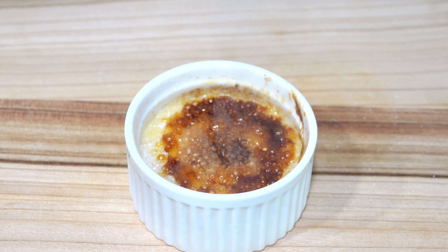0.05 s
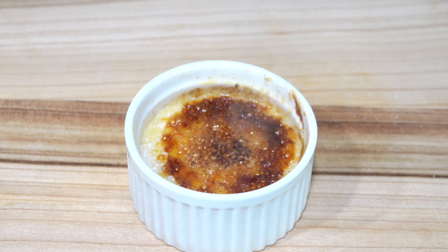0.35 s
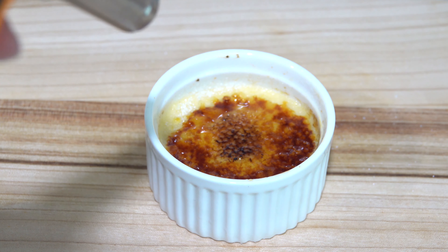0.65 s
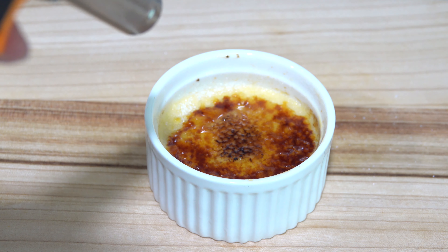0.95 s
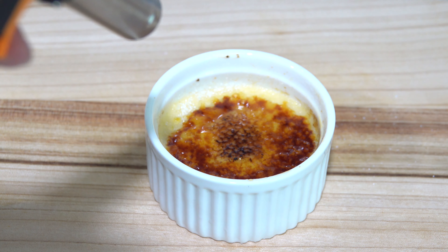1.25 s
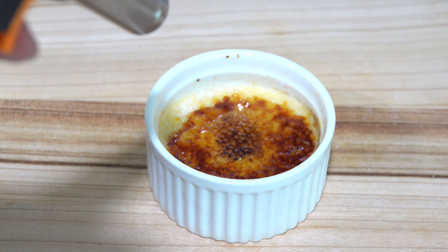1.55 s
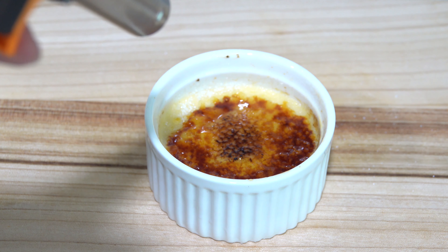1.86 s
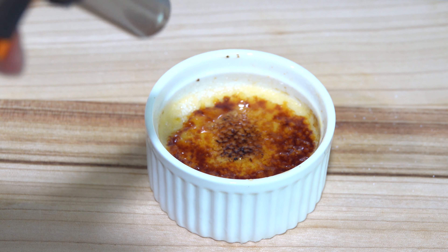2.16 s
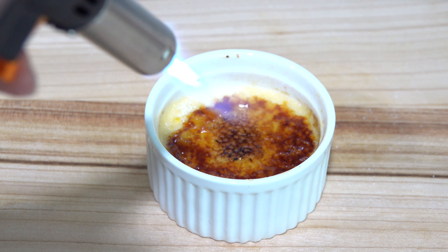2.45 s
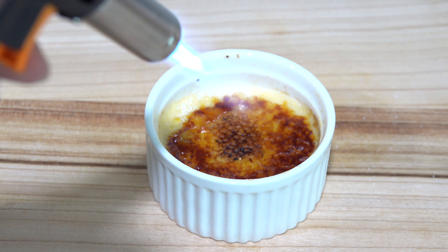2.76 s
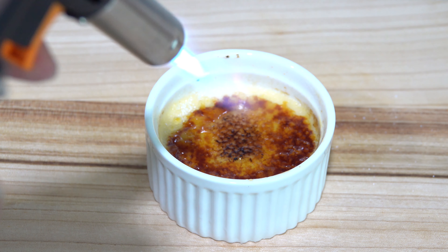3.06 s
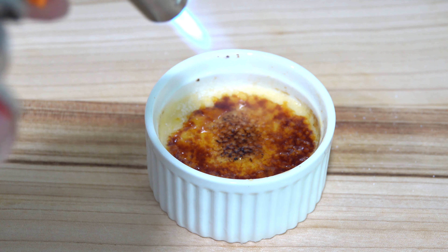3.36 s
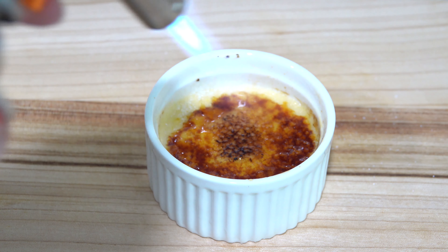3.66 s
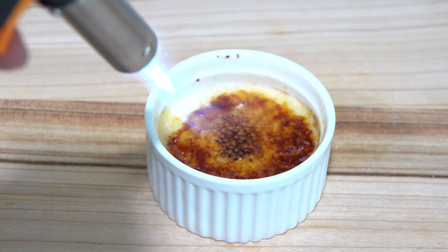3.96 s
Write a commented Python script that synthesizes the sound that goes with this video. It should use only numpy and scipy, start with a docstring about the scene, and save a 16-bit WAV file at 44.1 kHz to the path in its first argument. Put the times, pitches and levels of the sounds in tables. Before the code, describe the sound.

Close up in a quiet kitchen, a gas torch hisses, snaps alight and burns with a wavering roar and thin whistle. Faint knocks on wood come first, and the trigger clicks once just after ignition.

```python
"""A quiet kitchen, a stereo microphone close to a hand-held gas torch over a wooden board.
Soft knocks on the board, then the valve opens and cold gas hisses through the burner tube.
The igniter snaps, the gas catches with a thump and burns with an unsteady roar, the trigger clicks
back, and the hot tube rings higher. Low room rumble and mains hum lie underneath."""
import sys
import numpy as np
from scipy import signal
from scipy.fft import rfft, irfft
from scipy.io import wavfile
from scipy.ndimage import uniform_filter1d

SR = 44100
rng = np.random.default_rng(int(sys.argv[2]) if len(sys.argv) > 2 else 0)


def master(y):
    """Save y as 16-bit WAV."""
    cut = np.clip(np.atleast_2d(y).T, -1, 1)
    pcm = np.round(cut * 32767)  # scale
    wavfile.write(sys.argv[1], SR, pcm.astype(np.int16))


N = 176400
TIME, HZ = np.arange(N) / SR, np.fft.rfftfreq(N, 1 / SR)
LIGHT_S, CATCH_S = 2.307, 0.015  # when the gas lights, and how fast the flame takes over
BURN_S = np.maximum(TIME - LIGHT_S, 0)
ALIGHT = 1 - np.exp(-BURN_S / CATCH_S)  # 0 while cold, 1 once burning


# The flame, close up: frequency_hz, density_db
COMBUSTION_SPECTRUM = [(20, -79), (60, -79), (100, -63.5), (150, -73.5), (205, -59.5), (300, -57),
                       (420, -55), (610, -56), (760, -64.5), (1100, -71), (1750, -70.5), (2050, -76),
                       (3500, -81), (8000, -105)]
# Resonances of the space around the flame: pitch_hz, width_hz, lift_db
FLAME_HOLLOWS = [(222.5, 21.5, 9.5), (242.6, 13.7, -12.5), (285.6, 17, 4.5), (405, 45, 4.5), (450, 44, -1),
                 (546, 23, 8), (600, 28, 2.5), (644, 39, -1), (960, 160, 6), (1175, 20, 2.5), (1320, 21, 2),
                 (1440, 50, 0), (1684, 130, 2), (1810, 150, 0)]
# Strength of the roar: time_s, gain_db
ROAR_GAIN = [(2.35, -0.5), (2.55, 0), (2.8, -3), (3.05, -0.3), (3.35, -1), (3.65, -2), (3.85, -1), (4, -2)]

def roar(rise_s=0.06, swell_hz=11, swell_db=0.7):
    """Combustion noise builds after ignition and swells unevenly with the turbulence."""
    build = 1 - np.exp(-BURN_S / rise_s)
    swell = unit(amp(swell_db * wander(swell_hz)))
    return noise(COMBUSTION_SPECTRUM, FLAME_HOLLOWS) * build * swell * curve(ROAR_GAIN)


# The jet inside the flame: frequency_hz, density_db
HOT_JET_SPECTRUM = [(1000, -83), (2400, -80), (3600, -87), (4400, -78.5), (6200, -80.5), (7100, -83.5),
                    (7800, -90), (9000, -85), (10700, -89.5), (12500, -85), (14700, -84), (15800, -89)]
# Resonances of the hot burner tube: pitch_hz, width_hz, lift_db
HOT_TUBE_MODES = [(3050, 520, 10), (4765, 66, 5.5), (6740, 330, 7.5), (9680, 330, 10.5), (12050, 440, 7.5)]

def hot_gas(surge_db=5.5, settle_s=0.25, flutter_hz=70.5, flutter_db=0.93):
    """The burning jet rings the hot tube, louder at first and fluttering with the turbulence."""
    level = amp(surge_db * np.exp(-BURN_S / settle_s) + flutter_db * wander(flutter_hz))
    return noise(HOT_JET_SPECTRUM, HOT_TUBE_MODES) * ALIGHT * level


# Whistles of the hot tube: pitch_hz, width_hz, level_db, swell_exponent
TUBE_WHISTLES = [(3036, 87, -47.5, -0.29), (9430, 110, -54, 1), (11840, 220, -59, .7)]
# Swell of the upper whistles as the torch moves: time_s, gain_db
WHISTLE_GAIN = [(2.4, 1), (2.7, -1), (2.9, 2), (3.25, 7.5), (3.5, -4), (4, -8)]

def whistles(waver_hz=8.04, waver_share=.007):
    """Narrow, fuzzy tube resonances waver in pitch with the flame."""
    out, swell = np.zeros(N), curve(WHISTLE_GAIN)
    drift = 1 + waver_share * wander(waver_hz)
    for hz, width, db, exponent in TUBE_WHISTLES:
        fuzz = wander(width / 2) + 1j * wander(width / 2)
        tone = np.exp(2j * np.pi * np.cumsum(hz * drift) / SR)
        out += amp(db) * swell ** exponent * (fuzz * tone).real
    return out * ALIGHT


# Gas flow as the valve opens: time_s, gain_db
VALVE_FLOW = [(.7, -80), (.82, -52), (.88, -41), (.98, -25), (1.08, -14), (1.22, -7.5), (1.38, -4.5),
              (1.58, -0.5), (1.8, 0.5), (2.28, .5)]
# The unlit jet, close up: frequency_hz, density_db
COLD_JET_SPECTRUM = [(300, -96), (850, -93), (1200, -82), (1800, -84), (2500, -77), (2750, -75),
                     (3400, -72), (4200, -74), (5000, -78), (5900, -74.5), (7500, -79.5), (8300, -79),
                     (9100, -74.5), (10800, -83.5), (12500, -77.5), (14700, -80.5), (15800, -83)]
# Resonances of the cold burner tube: pitch_hz, width_hz, lift_db
COLD_TUBE_MODES = [(2905, 160, 12.5), (3130, 80, -3), (3330, 110, 3), (3670, 110, 3), (3995, 120, 12),
                   (4190, 90, -4), (4385, 100, 11.5), (5730, 160, 6), (6110, 100, 4), (6360, 36, 10),
                   (6510, 150, 15.5), (9700, 260, 7.5), (12050, 250, 4)]

def cold_gas(trickle_db=-11.5, lift_ratio=1.19):
    """The unlit jet rings the tube until the gas catches: whistly at a trickle, broader at full flow."""
    flow = curve(VALVE_FLOW)
    trickle = 1 / (1 + (flow / amp(trickle_db)) ** 2)
    sharp_modes = [(hz, width, lift * lift_ratio) for hz, width, lift in COLD_TUBE_MODES]
    broad = np.sqrt(1 - trickle) * noise(COLD_JET_SPECTRUM, COLD_TUBE_MODES)
    whistly = np.sqrt(trickle) * noise(COLD_JET_SPECTRUM, sharp_modes)
    return (broad + whistly) * flow * (1 - ALIGHT)


# Snaps of the igniter: start_s, level_db, decay_s, tilt_db_per_octave
IGNITER_SNAPS = [(2.3048, -5.5, 0.0029, 1), (2.3078, -9.5, 0.0015, -2.5), (2.311, -12, 0.0026, -5)]
# Colour of the snaps and the flare: frequency_hz, gain_db
IGNITER_COLOUR = [(100, -26), (450, -12.5), (950, -30), (1500, -7), (2700, -12.5), (3500, 2), (4500, -20),
                  (5450, 2.5), (7000, -6), (10500, -4), (13500, -3.5), (15400, 4.5)]

def igniter():
    """The igniter snaps in three sharp blows a few milliseconds apart."""
    return blows(IGNITER_SNAPS, IGNITER_COLOUR)


def flare(level_db=-22, decay_s=0.053):
    """The collected gas burns off in a short, bright rush."""
    return amp(level_db) * unit(noise(IGNITER_COLOUR)) * (BURN_S > 0) * np.exp(-BURN_S / decay_s)


# Low rings, dry and centred: start_s, pitch_hz, level_db, rise_s, decay_s
LOW_RINGS = [(2.309, 85, -26.5, 0.0045, 0.022), (2.308, 460, -22.5, 0.0025, 0.012),
             (3.9, 26, -35.5, 0.034, .1)]

def thumps():
    """The puff of igniting gas sets off two low rings; a faint, deeper bump comes near the end."""
    out = np.zeros(N)
    for start, hz, db, rise, decay in LOW_RINGS:
        age = np.maximum(TIME - start, 0)
        envelope = (1 - np.exp(-age / rise)) * np.exp(-age / decay)
        out += amp(db) * envelope * np.sin(2 * np.pi * hz * age)
    return out


# Clicks of the returning trigger: start_s, level_db, decay_s, tilt_db_per_octave
TRIGGER_CLICKS = [(2.6101, -17, 0.002, -3), (2.6128, -8, 0.0011, 0.5), (2.6158, -25.5, 0.015, -2)]
# Colour of the trigger: frequency_hz, gain_db
TRIGGER_COLOUR = [(300, -12), (1200, -9), (2000, -8.5), (3200, 4.5), (4100, -21), (5800, 5.5), (7500, 2),
                  (8600, -3.5), (13500, -16), (14400, -10), (15800, -7)]

def trigger():
    """The trigger springs back with a tight cluster of clicks."""
    return blows(TRIGGER_CLICKS, TRIGGER_COLOUR)


# Knocks on the board under the torch: start_s, level_db, decay_s, tilt_db_per_octave
BOARD_KNOCKS = [(.081, -35, 0.014, -1), (.0935, -37.5, 0.015, -1.5), (.305, -44, 0.013, -6)]
# Colour of the wood: frequency_hz, gain_db
BOARD_COLOUR = [(20, -50), (60, -13), (110, -5), (190, -18), (280, -1.5), (600, -21), (780, -13),
                (950, -13), (1140, -16), (1400, -23), (4000, -54), (15000, -72)]

def board():
    """Soft knocks ring the wooden board, dull and brief."""
    return blows(BOARD_KNOCKS, BOARD_COLOUR)


# Reverberation of the kitchen: frequency_hz, t60_s
KITCHEN_DECAY = [(100, 1.15), (1000, 0.01), (5000, 0.67), (15000, 0.14)]
# Stereo width at the microphone: frequency_hz, side_gain_db
STEREO_WIDTH = [(60, -28), (250, -20), (500, -6.5), (1000, -2), (2500, -5.5), (6000, -2.5), (9000, -2),
                (14000, -5.5)]

def kitchen(early_db=3.5, early_s=.014, even_over_hz=260):
    """Left and right room responses: sparse reflections, alike in the bass and wider in the treble."""
    size = SR // 2
    t, hz = np.arange(size) / SR, np.fft.rfftfreq(size, 1 / SR)
    taps = rng.choice([-1., 1.], (2, size)) * (rng.random((2, size)) < 1 / 10) * (t > .002)
    taps *= 1 + amp(early_db) * np.exp(-t / early_s)  # nearby surfaces thicken the start
    band, age, frames = signal.stft(taps, SR, nperseg=256)
    frames *= amp(-60 * age / spectrum(KITCHEN_DECAY, band)[:, None])
    tails = rfft(signal.istft(frames, SR, nperseg=256)[1][:, :size])
    broad_power = uniform_filter1d(abs(tails) ** 2, even_over_hz // 2, axis=1)
    mid, side = tails / np.sqrt(broad_power)  # evens out the colour
    side *= amp(spectrum(STEREO_WIDTH, hz))
    fade = np.cos(np.pi / 2 * t / t[-1])
    return irfft(np.array([mid + side, mid - side]), size) * fade


def placed(x, room, wet_db):
    """A still source reaches the microphone directly and by the room's reflections."""
    tail = signal.fftconvolve(x[None], room, axes=1)[:, :N]
    return (x + amp(wet_db) * tail) / np.sqrt(1 + amp(wet_db) ** 2)


def moving(x, rooms, wet_db, move_hz=.7):
    """The hand carries the torch from one set of reflections to the next."""
    turn = 2 * np.pi * (move_hz * TIME - np.arange(len(rooms))[:, None] / len(rooms))
    shares = np.maximum(np.cos(turn), 0)
    shares /= np.linalg.norm(shares, axis=0)
    tail = sum(signal.fftconvolve((x * share)[None], room, axes=1)[:, :N]
               for share, room in zip(shares, rooms))
    return (x + amp(wet_db) * tail) / np.sqrt(1 + amp(wet_db) ** 2)


# Room tone around the microphone: frequency_hz, density_db
ROOM_TONE = [(20, -99), (45, -72), (70, -76.5), (150, -85), (210, -77.5), (290, -77.5), (380, -84.5),
             (560, -87), (850, -93), (1200, -93), (1500, -102), (3000, -113), (5000, -112), (7000, -117),
             (16000, -119)]
# Thin hiss in the first half second: frequency_hz, density_db
OPENING_HISS = [(30, -84), (100, -91), (400, -88), (1500, -97), (2200, -95.5), (4500, -95.5), (6000, -100),
                (12500, -96), (15800, -101)]

def background(hiss_end_s=.505, whistle_hz=2354, side_db=-5):
    """Diffuse room rumble, and a thin, faintly whistling hiss that stops abruptly."""
    whistle = [(whistle_hz, 70, 11)]  # pitch_hz, width_hz, lift_db
    mid, side = [noise(ROOM_TONE) + noise(OPENING_HISS, whistle) * (TIME < hiss_end_s) for _ in range(2)]
    side = irfft(rfft(side) * amp(spectrum(STEREO_WIDTH) + side_db), N)
    return np.array([mid + side, mid - side])


def mains_hum(pitch_hz=50.6, level_db=-52.5):
    """The mains hum on one steady low tone."""
    return amp(level_db) * np.sqrt(2) * np.sin(2 * np.pi * pitch_hz * TIME)


def amp(db):
    """Decibels to gain."""
    return 10 ** (np.asarray(db) / 20)


def unit(x):
    """Scales to rms 1."""
    return x / np.sqrt(np.mean(x ** 2) + 1e-20)


def spectrum(points, hz=HZ):
    """Reads a table on a log-frequency axis."""
    f, value = np.transpose(points)
    return np.interp(np.log(hz + 1), np.log(f + 1), value)


def curve(points):
    """Gain over time from a table of levels."""
    return amp(np.interp(TIME, *np.transpose(points)))


def noise(density, resonances=()):
    """Noise of a given power per hertz, lifted or dipped at its resonances."""
    lift_db = sum(lift / (1 + (2 * (HZ - hz) / width) ** 2) for hz, width, lift in resonances)
    return irfft(rfft(rng.standard_normal(N)) * amp(spectrum(density) + lift_db), N) * np.sqrt(SR / 2)


def wander(rate_hz):
    """Random motion of rms 1 up to a rate."""
    return unit(irfft(rfft(rng.standard_normal(N)) / np.sqrt(1 + (HZ / rate_hz) ** 4), N))


def blows(rows, colour):
    """Each blow is a dense, quickly dying ring in the colour of the struck part."""
    out = np.zeros(N)
    for start, db, decay, tilt in rows:
        colour_db = spectrum(colour) + tilt * np.log2(HZ / 1000 + .1)
        ring = unit(irfft(rfft(rng.standard_normal(N)) * amp(colour_db), N))
        out += amp(db) * ring * (TIME >= start) * np.exp(-np.maximum(TIME - start, 0) / decay)
    return out


def scene():
    """Torch and board close to the microphone, with the kitchen behind them."""
    rooms = [kitchen() for _ in range(3)]
    # the cold hiss comes from two spots, nozzle and air inlet
    hiss = sum(placed(cold_gas(), room, wet_db=-0.5) for room in rooms[:2]) / np.sqrt(2)
    flame = moving(hot_gas() + whistles(), rooms, wet_db=0) + moving(roar(), rooms, wet_db=-6.5)
    snap = placed(igniter(), rooms[0], wet_db=1)
    catch = placed(flare(), rooms[0], wet_db=2) + thumps()
    clicks = placed(trigger(), rooms[1], wet_db=-4.5)
    knocks = placed(board(), rooms[2], wet_db=-2)
    return hiss + flame + snap + catch + clicks + knocks + background() + mains_hum()


def record(dry):
    """The recorder's band limit cuts the highest treble."""
    lowpass = signal.firwin(511, cutoff=15850, window=("kaiser", 9), fs=SR)
    return signal.oaconvolve(dry, lowpass[None], "same")


dry = scene()
out = record(dry)
master(out)
```